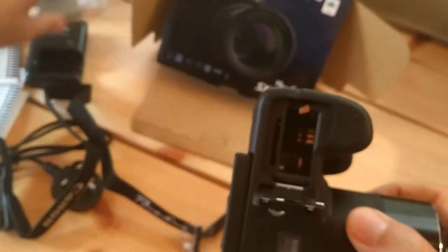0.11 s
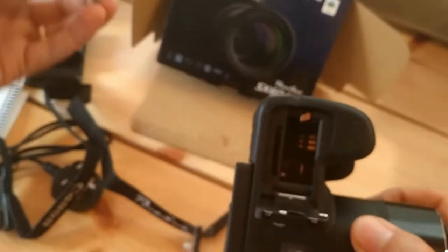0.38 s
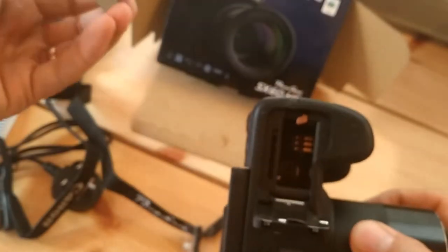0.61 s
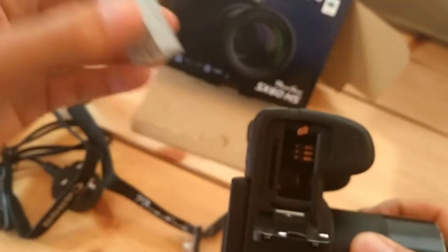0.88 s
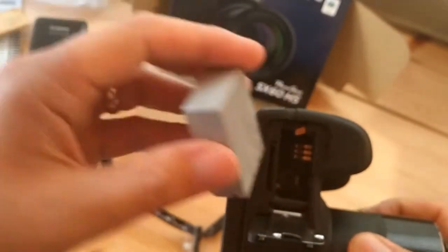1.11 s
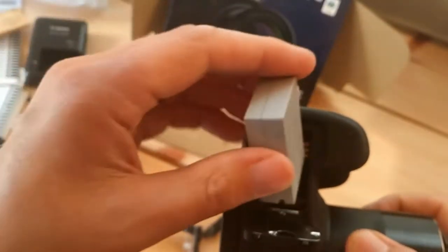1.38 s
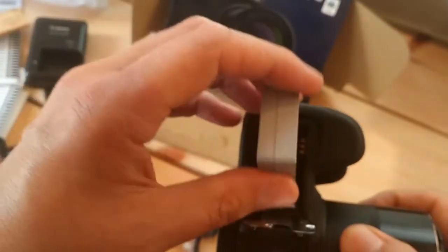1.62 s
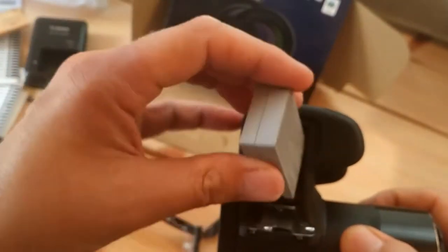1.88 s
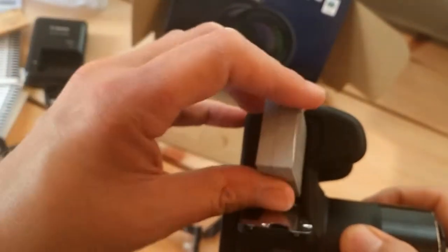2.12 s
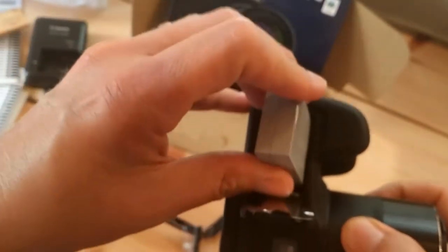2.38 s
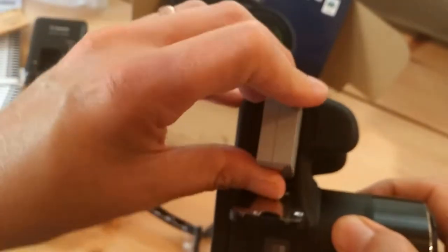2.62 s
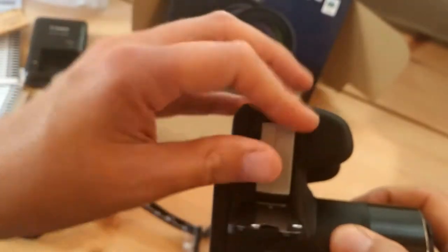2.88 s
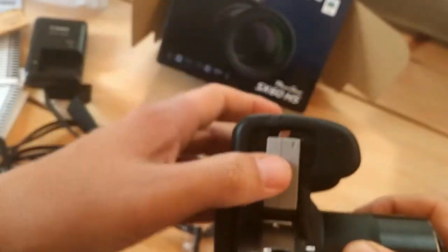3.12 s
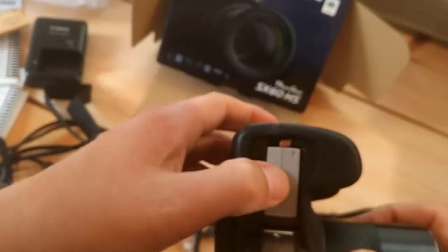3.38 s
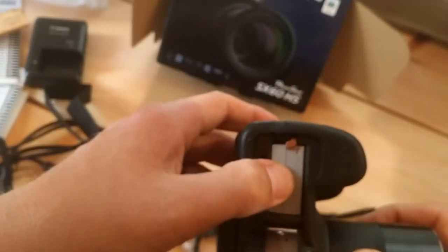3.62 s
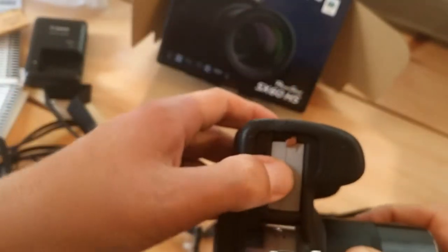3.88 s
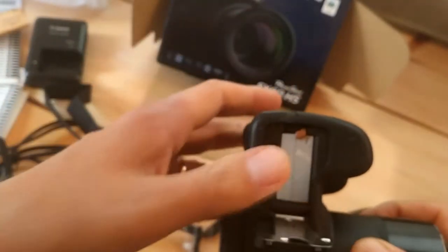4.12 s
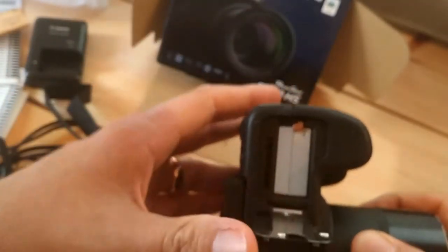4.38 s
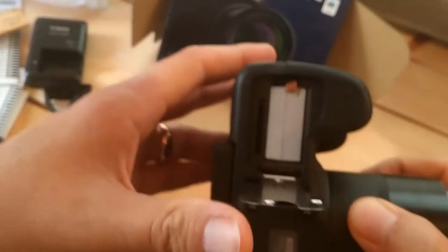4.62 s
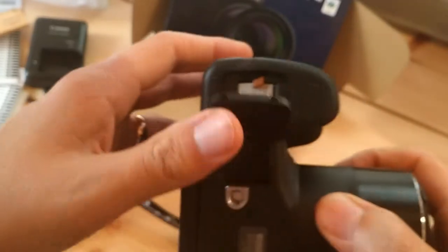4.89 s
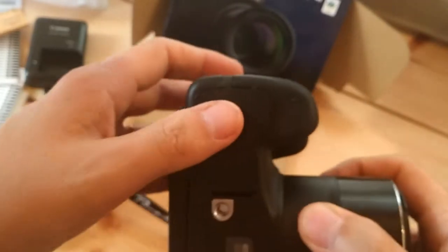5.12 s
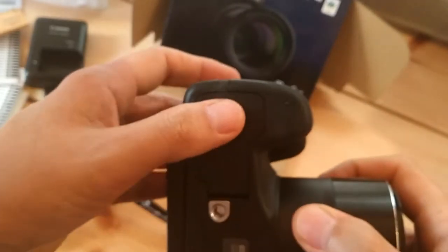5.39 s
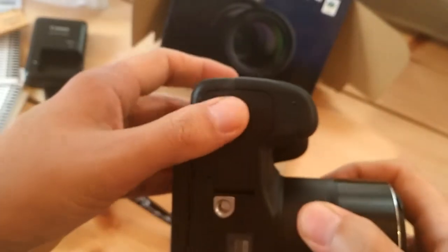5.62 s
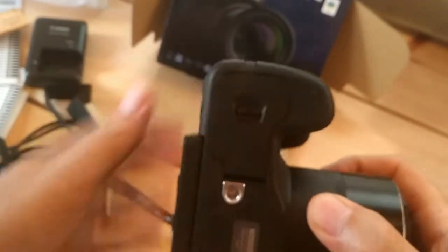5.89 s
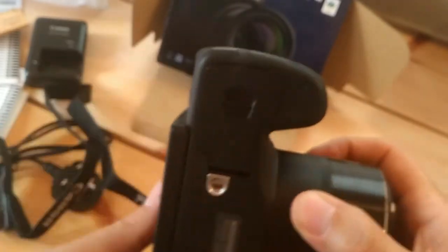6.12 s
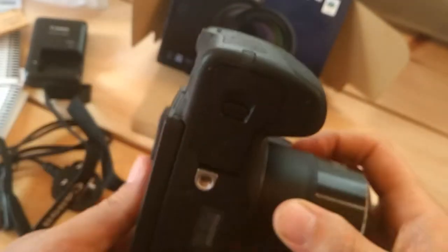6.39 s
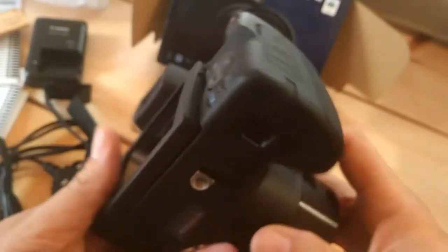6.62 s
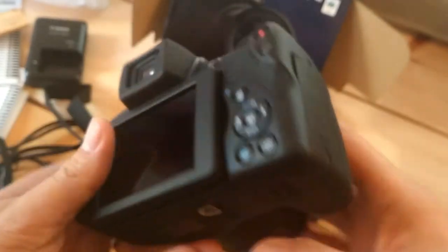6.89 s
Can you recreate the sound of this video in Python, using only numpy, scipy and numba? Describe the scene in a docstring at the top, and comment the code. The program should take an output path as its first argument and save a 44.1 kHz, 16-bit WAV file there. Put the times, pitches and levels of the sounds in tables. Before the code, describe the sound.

Close stereo microphone in a small, fairly dry room. A battery pack taps and scrapes lightly against a plastic camera grip, knocks several times, slides in with a quick cluster of clicks, and seats with a bright click. After a pause, the door ticks and then snaps shut, the loudest sound by far. Soft hand rubbing follows over faint air hiss and a far engine drone.

```python
"""Battery pack and camera grip

A battery pack is tapped, slid and clicked into a camera grip near a two-port microphone; the door snaps shut.
Each contact is a blow and a brief rattle that set damped modes of pins, latch, shell and grip ringing.
Rubbing is granular noise through a moving band-pass; a small room answers with scattered, decaying noise.
Distant engines are wavering sines, far hoots are tone pulses, and air and hiss are coloured noise."""
import sys
import numpy as np
from scipy import signal
from scipy.fft import rfft, irfft, next_fast_len
from scipy.io import wavfile
from scipy.ndimage import uniform_filter1d
from numba import njit

SR = 44100
rng = np.random.default_rng(int(sys.argv[2]) if len(sys.argv) > 2 else 0)


def inscribe(sig):
    """Save sig as 16-bit PCM at rate SR to the path in sys.argv[1].

    A 1-D sig is mono; a 2-D sig holds one channel per row.
    Samples are clipped to [-1, 1] before scaling.
    """
    pcm = np.round(np.clip(np.atleast_2d(sig).T, -1, 1) * 32767)
    wavfile.write(sys.argv[1], SR, pcm.astype(np.int16))


def ratio_of_db(decibels):
    """Turn decibels (scalar or array-like) into linear amplitude factors; 0 dB maps to 1."""
    return 10 ** (np.asarray(decibels, float) / 20)


N = 308920
FFT_SIZE = next_fast_len(N)
BINS_HZ = np.fft.rfftfreq(FFT_SIZE, 1 / SR)

# spectrum of room air and microphone hiss: f/Hz, relative level/dB
AIR_SPECTRUM = [(15, -69.5), (25, -40), (44, -10.5), (64, -9), (92, -6.5), (141, -12), (290, -13),
                (518, -18.5), (1100, -19.5), (1600, -24.5), (3000, -27), (10000, -30.5), (12600, -28),
                (16100, -33)]
# likeness of the air noise at the two ports: f/Hz, likeness/1 (0 to 1)
AIR_LIKENESS = [(60, 0.7), (130, 0.7), (290, 0.56), (640, 0.29), (1410, 0), (3100, 0), (6820, 0.14),
                (15000, 0.06)]
# faint far-off hoots: t/s of the peak, f/Hz, peak level/dB, length/s between the 1/e points
HOOTS = [(0.03, 972, -52.5, 0.014), (0.605, 245, -62.5, 0.2), (5.662, 853, -58, 0.023),
         (5.696, 886, -57, 0.032)]
# pitches of two idling engines close enough to beat: f/Hz
IDLE_HZ = 61.3, 66.4
# common level of the idling pair, before wavering: t/s, level/dB
IDLE_LEVEL = [(0.0, -59), (2.07, -56.5), (2.49, -51), (2.57, -62), (2.83, -48), (2.98, -63), (3.12, -48),
              (3.63, -59), (3.67, -72), (3.86, -49), (4.09, -67), (4.29, -57), (4.38, -68), (4.6, -52),
              (4.66, -63.5), (5.46, -56.5), (5.59, -67), (5.63, -67), (6.69, -54), (7.0, -57)]
# an engine speeding up, before shiver and wavering: t/s, f/Hz, level/dB
SPEEDING = [(3.3, 67.46, -56), (3.55, 73.17, -62.5), (3.85, 79.5, -59.5), (4.3, 79.92, -64),
            (4.7, 82.03, -75), (4.9, 83.24, -56), (5.1, 85.63, -49), (5.5, 85.3, -55.5), (5.9, 84.55, -62),
            (6.15, 87.5, -54), (6.35, 88.8, -64), (6.5, 88.4, -57), (6.7, 86.7, -59.5), (6.88, 88.2, -55),
            (7.0, 89.5, -76)]
# decay of the room: f/Hz, t60/s
ROOM_DECAY = [(200, 0.23), (1000, 0.16), (4000, 0.16), (6500, 0.14), (9000, 0.11), (15000, 0.05)]
# colour of rubbed plastic, before the moving band-pass: f/Hz, relative level/dB
RUB_COLOUR = [(300, -4), (1000, 0.5), (2500, -1.5), (5000, -5.5), (8000, 1.5), (12000, -2.5), (16000, -4)]
# strokes of skin and pack on plastic: start t/s, firmest t/s, end t/s, level/dB at the firmest,
# band-pass centre f/Hz; a row that ends before it starts is silent
STROKES = [(.68, .72, 0.76, -60, 7000), (1.414, 1.43, 1.53, -54, 6000), (1.727, 1.75, 1.84, -59, 8000),
           (1.91, 1.958, 2.03, -59.5, 5200), (1.991, 2.017, 2.18, -58.5, 5400),
           (2.12, 2.177, 2.27, -59.5, 4860), (2.24, 2.28, 2.4, -61, 6700), (2.615, 2.69, 2.76, -50.5, 7390),
           (2.717, 2.732, 2.775, -42, 4970), (2.7484, 2.755, 2.784, -35, 3500),
           (2.784, 2.787, 2.806, -35, 5300), (2.784, 2.82, 2.87, -51.5, 5420),
           (2.796, 2.91, 3.0, -51, 4860), (2.9, 2.997, 3.01, -52, 4200), (2.998, 2.997, 3.03, -49, 7330),
           (3.058, 3.071, 3.2, -55.5, 7450), (3.108, 3.147, 3.17, -64.5, 5600),
           (3.299, 3.312, 3.32, -43, 8040), (3.404, 3.428, 3.37, -54, 8050), (3.459, 3.48, 3.55, -56, 8250),
           (3.477, 3.486, 3.58, -59, 9570), (4.175, 4.225, 4.28, -52.5, 7300),
           (4.25, 4.28, 4.302, -41.5, 8300), (4.53, 4.57, 4.605, -56, 9310),
           (4.76, 4.825, 4.86, -52.5, 7060), (4.898, 4.92, 4.98, -57.5, 7500),
           (5.12, 5.16, 5.22, -55, 8000), (5.534, 5.61, 5.635, -64, 6300), (6.256, 6.262, 6.5, -55, 5470),
           (6.26, 6.324, 5.1, -64, 6400), (6.372, 6.417, 6.48, -58.5, 5780),
           (6.447, 6.533, 6.62, -57.5, 7400), (6.581, 6.666, 6.72, -56.5, 6740),
           (6.714, 6.798, 6.93, -59, 7040), (6.85, 6.93, 7.6, -61.5, 6600)]
# modes of the contact pins: f/Hz, relative level/dB, t60/s
PINS = [(10150, 0, 0.0024), (11500, -5.5, 0.0026), (12500, -14, .003), (13500, -10, .003),
        (14900, -11, 0.003)]
# modes of the latch: f/Hz, relative level/dB, t60/s
LATCH = [(5770, -1, 0.0037), (6600, 2.5, 0.0033), (6940, -3, .006), (8050, 2.5, 0.006),
         (8650, -3.5, 0.0032), (9530, 0, 0.0079)]
# modes of the shell's edge: f/Hz, relative level/dB, t60/s
EDGE = [(3003, 0, 0.0022), (3630, -0.5, 0.0044), (4260, -6, .006), (4660, -5, 0.007), (5300, -3, 0.0057)]
# modes of the shell: f/Hz, relative level/dB, t60/s
SHELL = [(1686, -3, 0.0069), (2125, 4, 0.0079), (2450, 1.5, 0.0045)]
# modes of the grip's wall: f/Hz, relative level/dB, t60/s
WALL = [(828, -3, 0.013), (997, 0, 0.0093), (1330, -1.5, 0.008)]
# modes of the grip's hollow: f/Hz, relative level/dB, t60/s
HOLLOW = [(215, -6.5, 0.013), (312, -5, 0.042), (495, 2.5, 0.024)]
# left minus right level/dB, one entry a part: pins, latch, edge, shell, wall, hollow
PART_PAN_DB = [0, 6, -5, 0.5, -5.5, 1]
# delay/ms of the right port, one entry a part in the same order
PART_LAG_MS = [0.032, 0.012, 0.094, .12, 0.11, .11]
# how strongly hardness tips each body towards its higher part: share/1 for catch, shell, grip
HARD_SHARE = [0.28, 1.02, 1.11]
# contacts: t/s, levels/dB of catch, shell and grip before the tilt by hardness, hardness/dB
CONTACTS = [(1.264, -39.5, -41.5, -38, 5), (1.4406, -44, -37, -38, -1.5), (1.507, -51, -46, -58, 2),
            (1.6928, -62, -48, -61, -4.5), (1.773, -36.5, -21, -31, -10), (1.8214, -47, -37.5, -36, -13.5),
            (1.8248, -29.5, -33.5, -44, 4), (1.8492, -38.5, -55, -49, -11), (1.953, -49.5, -45, -71, -4),
            (2.0465, -55, -48, -43, 0), (2.1941, -66, -50.5, -48, -8), (2.218, -64, -55, -55, 12),
            (2.4209, -30, -27.5, -31.5, -5), (2.5934, -51, -48, -44.5, 0), (2.6884, -44, -58, -53, 4),
            (2.6998, -38, -47, -50, 8.5), (2.7501, -28, -26.5, -29, 5), (2.7554, -40, -51, -36, 10),
            (2.7841, -37, -33.5, -44, 4), (2.7884, -33.5, -38, -34.5, -5), (3, -35.5, -43, -69, 12),
            (3.015, -45, -47, -64, 3), (3.3092, -35.5, -45, -61, -1.5), (3.3195, -40, -36, -39.5, 3.5),
            (3.4151, -47.5, -60, -69, 13), (3.49, -37, -48, -72, 17), (3.5355, -64, -46, -68, -2),
            (3.5659, -16, -17, -38.5, 7), (3.7762, -54, -51, -67, 0), (3.8695, -59, -51, -54, -4),
            (5.0251, -21, -34, -65, 5.5), (5.3294, -13, -45, -33.5, -6), (5.3313, -7.5, -19.5, -34.5, 15),
            (5.3325, -5, -29, -35, -11.5), (5.3337, -18.5, -21.5, -35, 9.5), (5.6426, -41, -60, -65, 0),
            (6.2614, -52.5, -54.5, -68, 18), (6.4604, -54, -51.5, -56, 1)]


def along(table, hz):
    """Interpolation on a log-frequency axis of (f/Hz, value) points."""
    f, v = np.transpose(table)
    return np.interp(np.log(np.maximum(hz, 1)), np.log(f), v)


def curve(table):
    """Linear interpolation in time: each column of a time table, one value per sample."""
    s, *columns = np.transpose(table)
    return [np.interp(np.arange(N) / SR, s, c) for c in columns]


def unit(x):
    """Normalisation to rms 1."""
    return x / np.sqrt(np.mean(x ** 2))


def colour(x, table):
    """Linear filtering: x is weighted by a spectrum of (f/Hz, level/dB) points."""
    return irfft(rfft(x, FFT_SIZE) * ratio_of_db(along(table, BINS_HZ)), FFT_SIZE)[:N]


def even(x, width_hz):
    """Spectral whitening: broad peaks and dips of a random response go, its fine grain stays."""
    spectrum = rfft(x)
    bins = max(int(width_hz * x.shape[-1] / SR), 1)
    broad_power = uniform_filter1d(np.abs(spectrum) ** 2, bins)
    return irfft(spectrum / np.sqrt(broad_power + 1e-18), x.shape[-1])


def walk(rate):
    """Random modulation: values drawn every 1 / rate s, joined by straight slews, rms 1."""
    k = int(SR / rate)
    held = np.repeat(rng.standard_normal(N // k + 1), k)
    return unit(uniform_filter1d(held, k)[:N])


def to_ports(x, pan_db, lag_ms):
    """Interaural principle: level and arrival time differ, the right port hearing x a little later."""
    delay = np.exp(-2j * np.pi * BINS_HZ * lag_ms / 1000)
    late = irfft(rfft(x, FFT_SIZE) * delay, FFT_SIZE)[:N]
    return np.array([x * ratio_of_db(pan_db / 2), late * ratio_of_db(-pan_db / 2)])


@njit
def moving_bandpass(x, hz, damping):
    """State-variable resonance: a band-pass of unit peak gain whose centre moves."""
    y, b, l = np.empty(len(x)), 0., 0.
    for i in range(len(x)):
        g = np.tan(np.pi * hz[i] / SR)
        v = (b + g * (x[i] - l)) / (1 + g * (g + damping))
        b, l, y[i] = 2 * v - b, l + 2 * g * v, damping * v
    return y


def air(level_db=-56.5):
    """Partial coherence: air and hiss share their bass at both ports, their treble is nearly unrelated."""
    alike = np.clip(along(AIR_LIKENESS, BINS_HZ), 0, 1)
    weight = ratio_of_db(along(AIR_SPECTRUM, BINS_HZ))
    mid, side = (rfft(rng.standard_normal(N), FFT_SIZE) * weight for _ in range(2))
    mid = irfft(mid * np.sqrt(1 + alike), FFT_SIZE)[:N]
    side = irfft(side * np.sqrt(1 - alike), FFT_SIZE)[:N]
    balance = ratio_of_db(np.array([[-.4], [.4]]))  # left, right
    return ratio_of_db(level_db) * unit(np.array([mid + side, mid - side])) * balance


def hoots():
    """Gaussian-windowed sines: short soft tones from far off, equal at both ports."""
    t = np.arange(N) / SR
    total = np.zeros(N)
    for s, hz, db, length in HOOTS:
        swell = np.exp(-((t - s) / (.5 * length)) ** 2)
        total += ratio_of_db(db) * swell * np.sin(2 * np.pi * hz * t)
    return total


def drone(hz, db, pan_db, shiver_hz, waver_db, left_lead=0.39):
    """Frequency and amplitude modulation: a far engine note shivers in pitch and wavers in level."""
    phase = 2 * np.pi * np.cumsum(hz + shiver_hz * walk(6.5)) / SR
    phase = phase + np.array([[left_lead], [0]])  # radians
    level = db + waver_db * walk(7) + np.array([[pan_db], [-pan_db]]) / 2
    return np.sqrt(2) * ratio_of_db(level) * np.sin(phase)


def engines():
    """Beating of near pitches: an idling pair shares its level; a third fades in as it pulls away."""
    each_db = curve(IDLE_LEVEL)[0] - 3  # two equal powers add 3 dB
    idle = sum(drone(hz, each_db, -2.7, 1.485, 3.0) for hz in IDLE_HZ)
    # a 0.1 s fade that ends at the first row of the table
    swell = np.clip((np.arange(N) / SR - SPEEDING[0][0]) / .1 + 1, 0, 1)
    return idle + swell * drone(*curve(SPEEDING), -3.33, 0.63, 1.19)


def room(x, level_db=-9, wall_rise_s=0.03, clutter_db=4, clutter_s=0.009):
    """Reverberation: hands, boxes and table scatter at once; walls follow, each pitch at its own decay."""
    t = np.arange(SR // 2) / SR
    hz, s, echoes = signal.stft(rng.standard_normal((2, len(t))), SR, nperseg=256)
    fading = echoes * np.exp(-np.log(1000) * s / along(ROOM_DECAY, hz)[:, None])
    walls = np.clip(t / wall_rise_s, 0, 1) ** 2
    clutter = ratio_of_db(clutter_db) * np.exp(-t / clutter_s)
    tail = signal.istft(fading, SR, nperseg=256)[1][:, :len(t)] * (walls + clutter)
    # no pitch rings out by luck; the longer a pitch lasts, the more it weighs
    weight = np.sqrt(along(ROOM_DECAY, np.fft.rfftfreq(len(t), 1 / SR)))
    tail = irfft(rfft(even(tail, 280)) * weight, len(t))[:, :SR // 3]
    tail = tail / np.sqrt((tail ** 2).sum(axis=1, keepdims=True))
    return ratio_of_db(level_db) * signal.fftconvolve(x, tail, axes=1)[:, :N]


def rubbing(grain_db=1.5, stutter_db=1.3, breadth=1.5):
    """Stick-slip friction: grains of noise over the shell; each stroke presses harder, then lets go."""
    fade_db, roundness = 23.5, 1.5  # fall from the firmest moment to the ends; 1 = pointed, 2 = round
    t = np.arange(N) / SR
    # a tiny floor centres the band-pass on 7000 Hz between strokes
    press, bright = np.full(N, 1e-9), np.full(N, 7e-6)
    for start, firm, end, db, hz in STROKES:
        span = slice(int(start * SR), int(end * SR))
        away = np.interp(t[span], [start, firm, end], [1, 0, 1])
        gain = ratio_of_db(db - fade_db * away ** roundness)
        press[span] += gain
        bright[span] += gain * hz
    grains = rng.standard_normal(N) * ratio_of_db(grain_db * walk(700) + stutter_db * walk(140))
    # overlapping strokes share one centre, weighted by their pressure
    centre_hz = np.clip(bright / press, 1000, 13000)
    skin = moving_bandpass(colour(grains, RUB_COLOUR), centre_hz, breadth)
    return to_ports(unit(skin) * press, pan_db=0.98, lag_ms=0.038)


def ring(modes, chance, detune=0.016, scatter_db=2.96):
    """Modal superposition: damped sines answer a click, each contact exciting them a little differently."""
    t = np.arange(2048) / SR
    hz, db, t60 = np.transpose(modes)[:, :, None]
    pitch_luck, level_luck = chance[:2, :len(modes), None]
    # neighbouring modes swing in opposite senses
    sense = (-1.) ** np.arange(len(modes))[:, None]
    decay = np.exp(-np.log(1000) * t / t60)
    swing = np.sin(2 * np.pi * hz * (1 + detune * pitch_luck) * t)
    return (sense * ratio_of_db(db + scatter_db * level_luck) * decay * swing).sum(axis=0)


def rattle(chance, level_db=-15, fade_ms=1.55):
    """Repeated impact: a blow and a fading chatter of micro-impacts, its broad spectrum made even."""
    t = np.arange(512) / SR
    chatter = ratio_of_db(level_db) * chance[:512] * np.abs(chance[512:1024]) * np.exp(-1000 * t / fade_ms)
    chatter[0] = 1
    # many tiny impacts together cover all pitches evenly
    return even(chatter, 400) * np.exp(-500 * t / fade_ms)


def taps():
    """Impact excitation: every contact's rattle rings all parts, a hard one favouring the higher parts."""
    # higher and lower part of each body: catch, shell, grip
    body = PINS, LATCH, EDGE, SHELL, WALL, HOLLOW
    parts = np.zeros((len(body), N + 8192))
    chance = rng.standard_normal((len(CONTACTS), 1024 + 12 * len(body)))
    for (s, *struck, hard), row in zip(CONTACTS, chance):
        tilt = np.outer(HARD_SHARE, [hard, -hard]).ravel() / 2
        levels = np.repeat(struck, 2) + tilt
        chatter = rattle(row)
        i = int(s * SR)
        for part, modes, db, luck in zip(parts, body, levels, row[1024:].reshape(-1, 2, 6)):
            sound = signal.fftconvolve(chatter, ring(modes, luck))
            # the level is the rms the sound would have if its energy were spent in 0.61 ms
            rms = np.sqrt((sound ** 2).sum() / (0.00061 * SR))
            part[i:i + len(sound)] += sound * ratio_of_db(db) / rms
    both = sum(to_ports(p[:N], pan, lag) for p, pan, lag in zip(parts, PART_PAN_DB, PART_LAG_MS))
    # so small a body radiates no deep bass
    return signal.sosfilt(signal.butter(3, 150, "highpass", fs=SR, output="sos"), both)


def scene():
    """Superposition: the camera in the hands, the room around it and the far background add."""
    near = taps() + rubbing()
    return near + room(near) + engines() + hoots() + air()


def top_cut(x):
    """Nothing passes above the cut-off."""
    return signal.sosfilt(signal.butter(12, 16230, fs=SR, output="sos"), x)


def record(dry):
    """Amplitude limiting: whatever exceeds full scale is clipped."""
    mix = np.clip(dry, -1, 1)
    return top_cut(mix)


dry = scene()
out = record(dry)
inscribe(out)
```